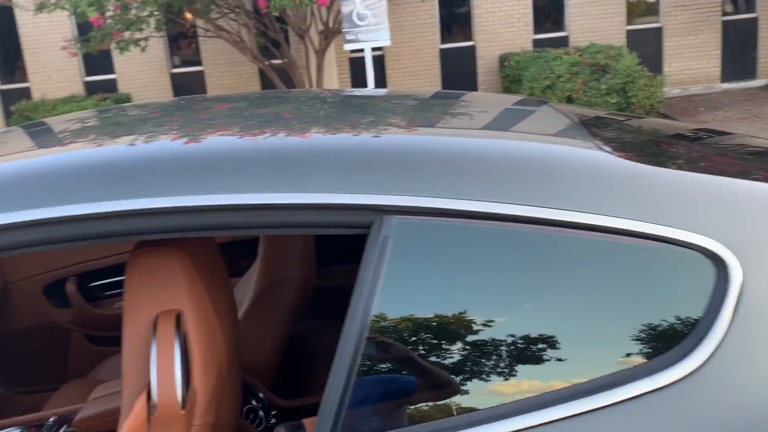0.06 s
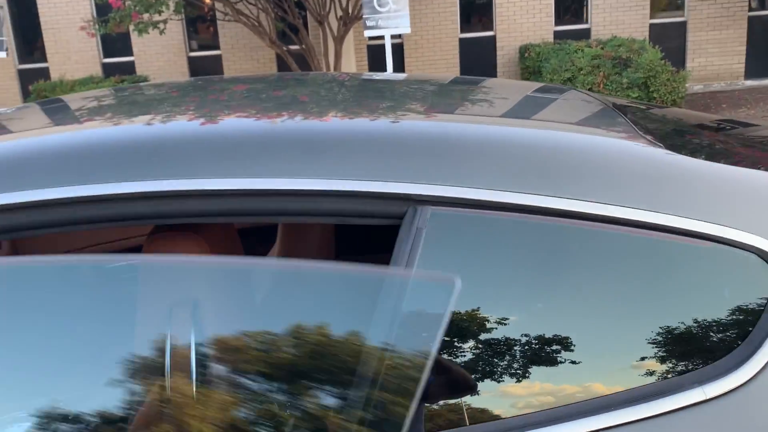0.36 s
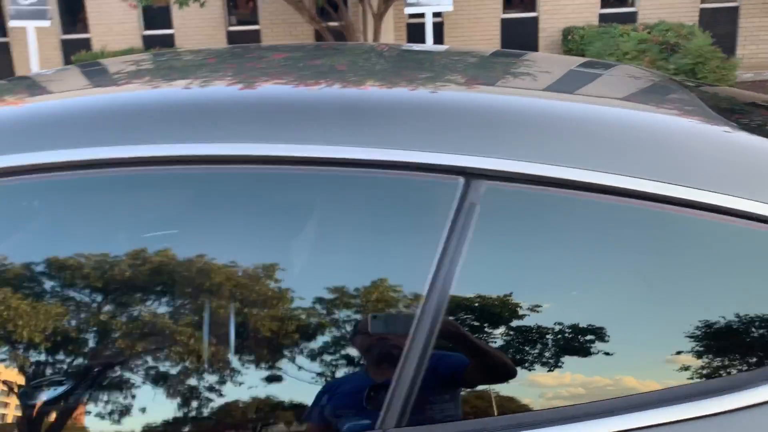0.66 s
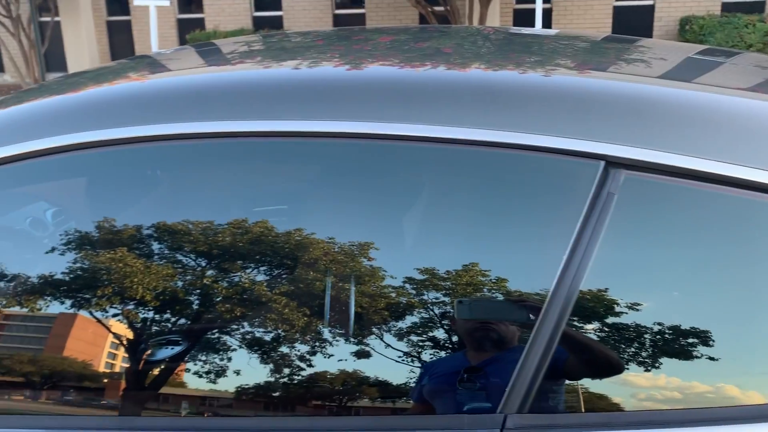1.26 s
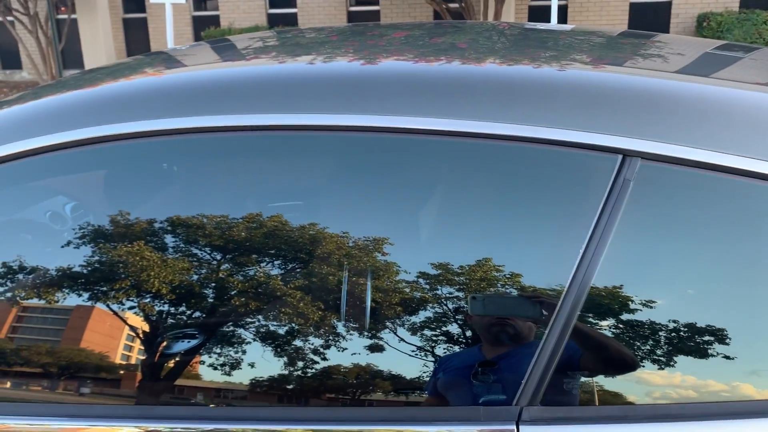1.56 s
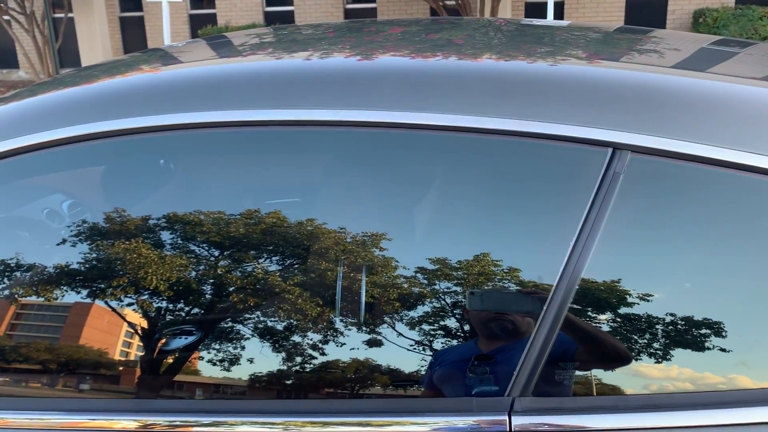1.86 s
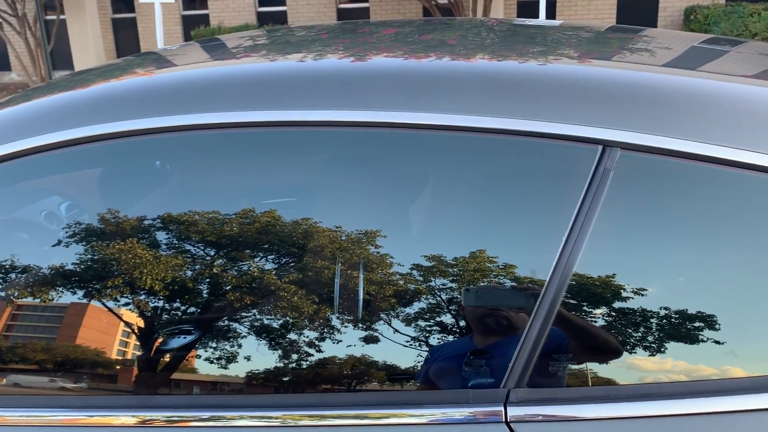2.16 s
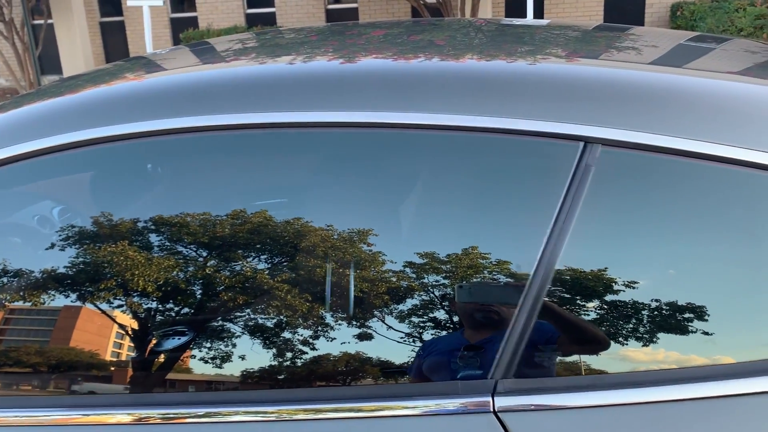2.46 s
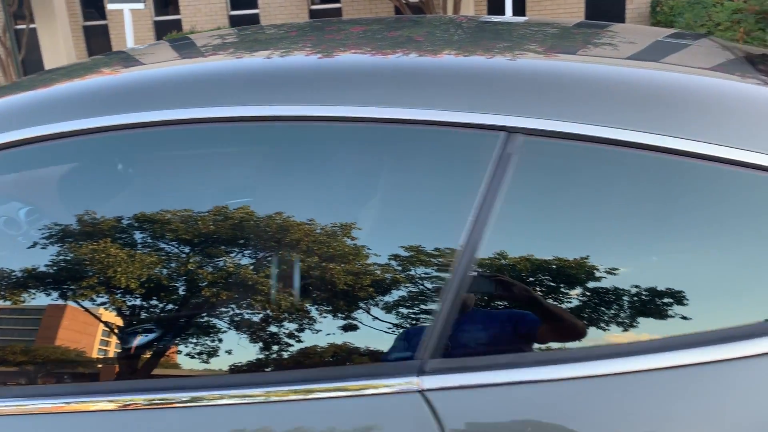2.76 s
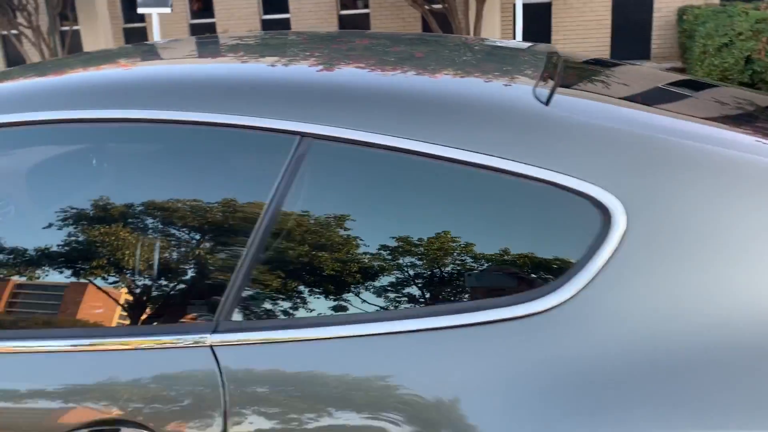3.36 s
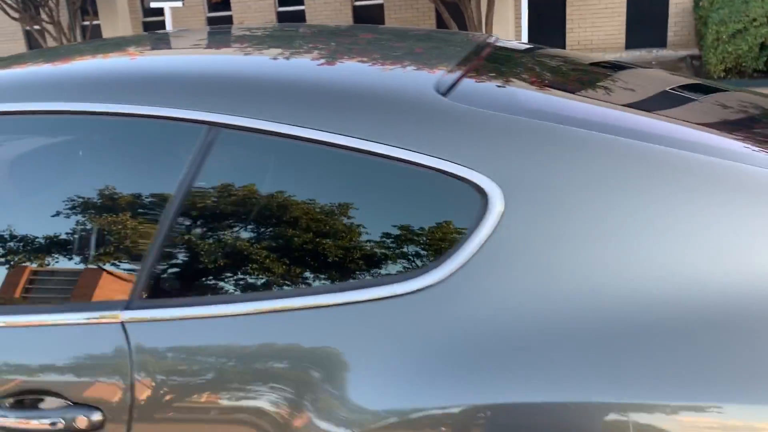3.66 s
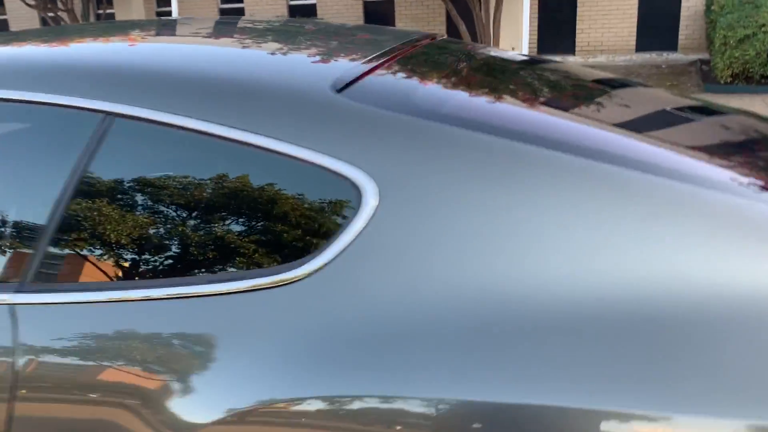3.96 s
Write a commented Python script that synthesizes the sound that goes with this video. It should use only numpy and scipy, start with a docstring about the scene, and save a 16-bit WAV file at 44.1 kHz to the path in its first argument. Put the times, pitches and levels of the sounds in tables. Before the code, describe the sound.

A car's power window slides up close by, with a soft hiss, thin squeal and fading low hum. At about 0.7 seconds the glass squeaks into its rubber seal and stops with a quick double thunk. An engine idles with a deep burble throughout, its murmur growing from about 2 to 4 seconds. Distant traffic washes around, with tyre hiss from the left, and light wind brushes the microphone.

```python
"""A car park: a car's side window glides up, squeezes into its rubber seal and stops with a double thunk.
The glass hisses in its channel, slips and squeaks on the rubber, and its blows ring door, frame and pane.
Close by, the engine idles with a deep burble from its uneven cylinders and a rumbling exhaust.
Distant traffic washes around, with tyre hiss from the left, and light air buffets the microphone."""
import sys
import numpy as np
from scipy import signal
from scipy.fft import rfft, irfft
from scipy.io import wavfile

SR = 44100
rng = np.random.default_rng(int(sys.argv[2]) if len(sys.argv) > 2 else 0)


def unload_wav(signal):
    """Save mono or channel-first audio to the path in sys.argv[1] as 16-bit WAV at rate SR, clipped to [-1, 1]."""
    wavfile.write(
        sys.argv[1],
        SR,
        np.round(np.clip(np.atleast_2d(signal).T, -1, 1) * 32767).astype(np.int16),
    )


N = 176400
TIME = np.arange(N) / SR

# left-right likeness of sounds at the window and of diffuse sounds: f/Hz, correlation (-1..1)
NEAR_LIKENESS = [(100, 0.89), (640, 0.96), (1400, 0.7), (3100, 0.18), (7000, 0)]
DIFFUSE_LIKENESS = [(60, 1), (290, 0.84), (640, 0.5), (1400, -0.45), (2400, -0.18), (3100, 0.039),
                    (6800, -0.11)]


def blows():
    """The glass knocks in its guides, hits the top and seats: door, frame and pane ring under a crack."""
    # ringing modes: f/Hz, level/dB, t60/s
    door_modes = [(40, -5.5, 0.3), (86, 3.5, 0.16), (143.3, -3.5, 0.27), (194, -17, 0.04), (263, -9, 0.038)]
    frame_modes = [(540, -5, .024), (640, 1.5, .034), (838, 0, .036), (1030, -14, .06), (1500, -15, .03)]
    pane_modes = [(1212, -1.5, 0.042), (1543, -4, 0.026), (2085, -0.5, 0.027), (2457, 3.5, 0.034),
                  (2760, -5.5, 0.033), (3070, -8.5, 0.065), (4390, -10, 0.025)]
    # crack of each contact and bright snap of the pane's edge: f/Hz, level/dB
    crack_spectrum = [(150, 10), (800, 24), (2500, -4), (4400, 16.5), (6200, -13), (8500, -19),
                      (10500, -35), (15500, -31)]
    snap_spectrum = [(2000, -28), (5000, -5), (8300, 0), (10000, -15), (11500, -1), (13300, -21),
                     (15500, -3)]
    # blows of the glass: t/s, door/dB, frame/dB, pane/dB, crack/dB, snap/dB
    hits = [(.196, -46, -26, -44, -44, -60), (.2005, -44, -20, -45, -45, -50),
            (.243, -37, -22, -38.5, -38, -55), (.696, -32, -26, -15.5, -17, -27),
            (0.699, -16, -36, -19, -21, -25.5), (.707, -43, -37, -36, -27, -27.5),
            (0.7258, -37, -40, -29, -29, -26), (0.730, -18, -4.5, -23, -30, -32),
            (0.7349, -12, -50, -28, -36, -38), (0.749, -42, -40, -44, -35, -37),
            (0.7716, -23, -18, -39, -54, -39)]
    crack_t60, snap_t60 = .029, .021  # s
    attack_s, frame_attack_s, pane_lag_s = .00059, .0022, .00008
    t = TIME[:SR // 2]
    crack = colour(noise(), crack_spectrum, NEAR_LIKENESS)
    snap = colour(noise(), snap_spectrum, NEAR_LIKENESS)
    door = ring(door_modes, t)
    frame = np.minimum(t / frame_attack_s, 1) * ring(frame_modes, t)
    pane = np.array([ring(pane_modes, t), ring(pane_modes, np.maximum(t - pane_lag_s, 0))])
    out = np.zeros((2, N))
    for start, door_db, frame_db, pane_db, crack_db, snap_db in hits:
        span = slice(round(start * SR), round(start * SR) + len(t))
        body = amp(door_db) * door + amp(frame_db) * frame + amp(pane_db) * pane
        contact = amp(crack_db - 60 * t / crack_t60) * crack[:, span]
        contact += amp(snap_db - 60 * t / snap_t60) * snap[:, span]
        out[:, span] += np.minimum(t / attack_s, 1) * (body + contact)
    return out


def thuds():
    """The whole pane flexes against the rubber, lower once it is seated."""
    # hollow thuds: t/s, f/Hz, level/dB, t60/s
    flexes = [(.673, 354, -22, .08), (0.6996, 300, -2.5, 0.026), (.702, 80, -9, .05),
              (.736, 268, -11.5, 0.056), (0.7469, 219, -7.5, 0.082), (0.756, 91, -15, 0.061),
              (.786, 218, -13, 0.084)]
    attack_s = .0022
    out = np.zeros(N)
    for start, hz, db, t60 in flexes:
        t = np.maximum(TIME - start, 0)
        out += np.minimum(t / attack_s, 1) * ring([(hz, db, t60)], t)
    return out


def slide():
    """The rising glass hisses in its channel; thin squeals waver and fade."""
    # sliding hiss: f/Hz, level/dB
    spectrum = [(200, -12.5), (600, 13), (2200, -7), (4200, -9.5), (5500, -13), (7000, -9), (9000, -22.5),
                (15000, -44.5)]
    # envelope of the travel: t/s, level/dB
    envelope = [(0, -44.5), (.1, -43.5), (.22, -45), (.35, -50), (.62, -55.5), (.72, -80)]
    # squeal bands: f/Hz, width/Hz, level/dB
    squeals = [(4210, 96, -11), (6650, 170, -24), (7280, 90, -22), (8300, 170, -20.5), (8800, 130, -16.5)]
    waver_db, waver_hz, fade_db_per_s = .5, 13, 20.5
    squeal = sum(amp(db + waver_db * band(0, waver_hz)[0]) * band(hz, width)
                 for hz, width, db in squeals)
    hiss = colour(noise(), spectrum, NEAR_LIKENESS)
    return amp(curve(envelope)) * (hiss + amp(-fade_db_per_s * TIME) * squeal)


def seal():
    """Tiny, dense slips and a hiss as the glass is pressed into the rubber."""
    # rubbing on the seal: f/Hz, level/dB
    spectrum = [(200, -6), (600, 8.5), (1700, 0), (2400, -2.5), (3700, -5), (5200, -15), (8000, -21),
                (11000, -30), (15500, -28)]
    # envelope of the squeeze: t/s, level/dB
    envelope = [(.66, -52), (.68, -36), (.689, -18), (.697, -20), (.704, -34), (.722, -29), (.731, -27.5),
                (.745, -35), (.79, -42)]
    slips_per_s, spread_db, hiss_gain = 2100, 2.5, .59
    slips = noise() * (rng.random(N) < slips_per_s / SR)
    slips *= amp(spread_db * np.minimum(rng.exponential(1, N), 3))
    rub = colour(unit(slips) + hiss_gain * noise(), spectrum, NEAR_LIKENESS)
    touching = (TIME > envelope[0][0]) & (TIME < envelope[-1][0])
    return touching * amp(curve(envelope)) * rub


def squeaks():
    """Rubber chirps on the glass entering the seal, each chirp falling in pitch."""
    # rubber chirps: t/s, starting f/Hz, level/dB
    chirps = [(0.6831, 1750, -23.5), (.6905, 1270, -39)]
    length_s, fall_share = .0071, .48
    out = np.zeros(N)
    for start, hz, db in chirps:
        progress = np.clip((TIME - start) / length_s, 0, 1)
        arch = 2 * np.sqrt(progress * (1 - progress))
        pitch = hz * (1 - fall_share * progress) * (progress > 0)
        out += amp(db) * arch * np.sin(2 * np.pi * np.cumsum(pitch) / SR)
    return out


def bright_tail():
    """A faint, bright tail fades after the thunk, with one last soft tick."""
    # colour of the tail: f/Hz, level/dB
    spectrum = [(3000, -15.5), (8000, -0.5), (11000, -11), (15500, -21.5)]
    # envelope of tail and tick: t/s, level/dB
    envelope = [(.74, -120), (.77, -61), (.835, -63), (.845, -52), (.858, -62), (1.1, -120)]
    return amp(curve(envelope)) * colour(noise(), spectrum, NEAR_LIKENESS)


def hum():
    """A low hum drifts up in pitch and fades while the glass travels."""
    # glide of the hum: t/s, f/Hz, level/dB
    glide = [(0, 94.4, -16), (.25, 94.5, -22), (.45, 100.4, -22.5), (.65, 97.6, -34), (.8, 104, -100)]
    times, hz, db = np.transpose(glide)
    cycles = np.cumsum(np.interp(TIME, times, hz)) / SR
    return amp(np.interp(TIME, times, db)) * np.sin(2 * np.pi * (cycles + rng.random()))


def echoes(x):
    """Short scatter from the car body and the pavement."""
    t60, predelay_s = .055, .004
    spectrum = [(100, -4), (3000, -9), (12000, -2)]  # f/Hz, level/dB
    t = TIME[:SR // 2]
    scatter = colour(noise(), spectrum, DIFFUSE_LIKENESS)[:, :len(t)]
    tail = scatter * amp(-60 * t / t60) * (t > predelay_s)
    return signal.fftconvolve(x, tail / np.linalg.norm(tail[0]), axes=1)[:, :N]


def engine():
    """A gently surging idle: firing orders, wavering orders from uneven cylinders, and exhaust rumble."""
    # idle speed: t/s, four-stroke cycle rate/Hz
    speed = [(0, 6.85), (.6, 6.84), (.9, 6.795), (2.15, 6.79), (2.4, 6.895), (4, 6.89)]
    # exhaust harmonics: multiple of the cycle rate, level/dB
    orders = [(8, -20), (10, -28), (12, -25), (14, -35), (15, -30.5), (16, -29), (20, -35), (30, -44)]
    # exhaust rumble: f/Hz, level/dB
    rumble_spectrum = [(15, -36.5), (32, -13), (50, -3), (70, 0), (95, 1.5), (120, -1), (160, -13),
                       (260, -18), (500, -69.5)]
    # envelopes of the exhaust: t/s, level/dB
    tone_envelope = [(0, -1), (4, 1.5)]
    rumble_envelope = [(0, -22), (1.5, -24.5), (4, -30.5)]
    surge_hz, surge_depth, tone_boost_db = 4.6, .018, 1
    slight_waver, uneven_waver, waver_hz = .07, .45, 1.4
    surge = 1 + surge_depth * np.sin(2 * np.pi * (surge_hz * TIME + rng.random()))
    cycles = np.cumsum(curve(speed) * surge) / SR
    tone = np.zeros(N)
    for order, db in orders:
        # every fourth harmonic holds nearly steady; the others waver more
        depth = slight_waver if order % 4 == 0 else uneven_waver
        drift = depth * band(0, waver_hz)
        waver = 1 + drift[0] + 1j * drift[1]  # moves both level and phase
        harmonic = np.exp(2j * np.pi * (order * cycles + rng.random()))
        tone += amp(db) * unit((waver * harmonic).real)
    tone *= amp(tone_boost_db + curve(tone_envelope))
    rumble = amp(curve(rumble_envelope)) * colour(noise(), rumble_spectrum, [(60, .7), (200, .62)])
    return (tone + rumble) * amp([[-.2], [.2]])  # a touch to the right


def drone():
    """The engine's low-mid murmur, slightly to the left, grows toward the end."""
    # engine murmur: f/Hz, level/dB
    spectrum = [(100, -18), (200, 7.5), (290, -6), (380, 6.5), (470, -1), (600, -13), (1500, -49)]
    # its swell: t/s, level/dB
    envelope = [(0, -47.5), (1.6, -47), (3.1, -35.5), (3.4, -33.5)]
    return amp(curve(envelope)) * colour(noise(), spectrum, DIFFUSE_LIKENESS) * amp([[.8], [-.8]])


def traffic():
    """A far, faintly fluttering wash, and tyre hiss that reaches the left side first."""
    # traffic wash and tyre hiss: f/Hz, level/dB
    wash_spectrum = [(40, -27), (150, 1.5), (290, 2), (450, -4.5), (780, -6.5), (1200, -9.5), (1800, -15),
                     (3100, -26.5), (4700, -32.5), (8700, -42), (10000, -66), (15500, -73)]
    tyre_spectrum = [(300, -13.5), (1700, 4.5), (2500, 1), (3100, -7.5), (4700, -14.5), (6500, -27.5),
                     (8700, -24), (11000, -61.5)]
    # their envelopes: t/s, level/dB
    wash_envelope = [(0, -30.5), (4, -31)]
    tyre_envelope = [(0, -49.5), (.8, -46), (1.9, -43), (2.42, -48), (2.5, -42), (3.1, -45), (3.5, -42),
                     (4, -53.5)]
    right_lag_s = .00044
    wash_db = curve(wash_envelope) + .49 * band(0, width_hz=17)[0]
    wash = amp(wash_db) * colour(noise(), wash_spectrum, DIFFUSE_LIKENESS)
    tyre_db = curve(tyre_envelope) + .5 * band(0, width_hz=9.8)[0]
    hiss = amp(tyre_db) * colour(noise(), tyre_spectrum, DIFFUSE_LIKENESS)[0]
    return wash + np.array([hiss, np.interp(TIME - right_lag_s, TIME, hiss)])


def breeze():
    """Light air buffets the microphone."""
    # low buffeting: f/Hz, level/dB
    spectrum = [(10, -18), (32, 7.5), (45, -11), (100, -22.5), (400, -77.5)]
    # strength of the breeze: t/s, level/dB
    envelope = [(0, -33), (1.1, -34.5), (1.9, -31.5), (2.5, -43)]
    return amp(curve(envelope)) * colour(noise(), spectrum, [(20, .86), (100, .9)])


def amp(db):
    """Decibels to gain."""
    return 10 ** (np.asarray(db) / 20)


def unit(x):
    """Scales to rms 1."""
    return x / np.sqrt(np.mean(x ** 2) + 1e-20)


def curve(points):
    """Joins (t/s, value) points over the whole scene."""
    return np.interp(TIME, *np.transpose(points))


def log_curve(points, hz):
    """Joins (f/Hz, value) points on a log-frequency axis."""
    f, value = np.transpose(points)
    return np.interp(np.log(hz + 1), np.log(f + 1), value)


def colour(pair, spectrum, likeness):
    """Gives two unrelated signals a spectral shape and a left-right likeness; rms 1."""
    hz = np.fft.rfftfreq(N, 1 / SR)
    correlation = np.clip(log_curve(likeness, hz), -1, 1)
    mid, side = rfft(pair) * np.sqrt([1 + correlation, 1 - correlation])
    stereo = np.array([mid + side, mid - side])
    return unit(irfft(stereo * amp(log_curve(spectrum, hz)), N))


def noise():
    """Two channels of white noise."""
    return rng.standard_normal((2, N))


def band(hz, width_hz):
    """Two channels of noise in one bell-shaped band; at 0 Hz, a slow random drift."""
    f = np.fft.rfftfreq(N, 1 / SR)
    bell = np.exp(-((f - hz) / width_hz) ** 2)
    return unit(irfft(rfft(noise()) * bell, N))


def ring(modes, t):
    """Damped modes after a blow."""
    return sum(amp(db - 60 * t / t60) * np.sin(2 * np.pi * hz * t) for hz, db, t60 in modes)


def scene():
    """The window closes over the idling engine and the traffic."""
    echo_db = -4.5
    window = slide() + seal() + squeaks() + blows() + thuds() + bright_tail()
    return window + amp(echo_db) * echoes(window) + engine() + hum() + drone() + traffic() + breeze()


def record(dry):
    """A soft clip rounds the highest peaks; a low-pass trims the very top."""
    ceiling, cutoff_hz = .85, 15800
    rounded = dry / (1 + (dry / ceiling) ** 8) ** (1 / 8)
    low_pass = signal.firwin(511, cutoff_hz, window=("kaiser", 9), fs=SR)
    padded = np.pad(rounded, ((0, 0), (255, 255)), "edge")
    return signal.oaconvolve(padded, low_pass[None], "valid")


dry = scene()
out = record(dry)
unload_wav(out)
```